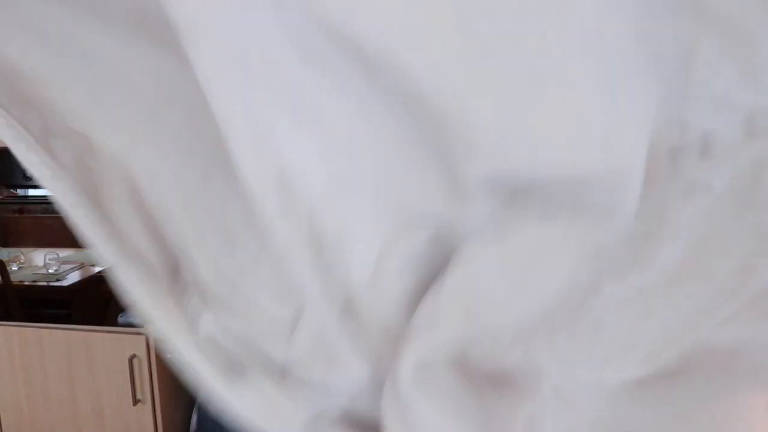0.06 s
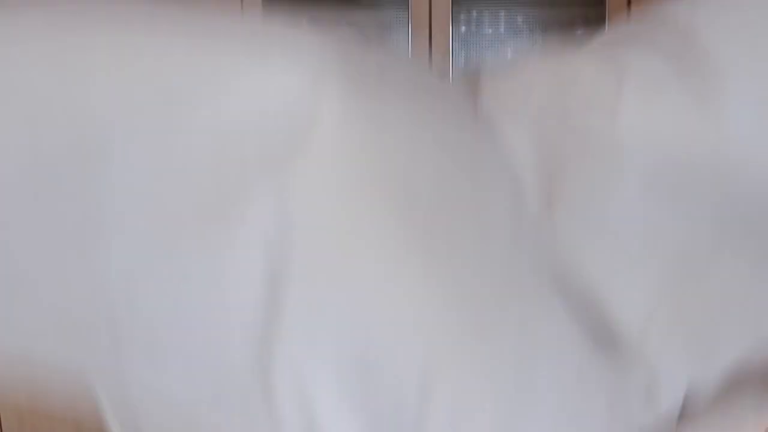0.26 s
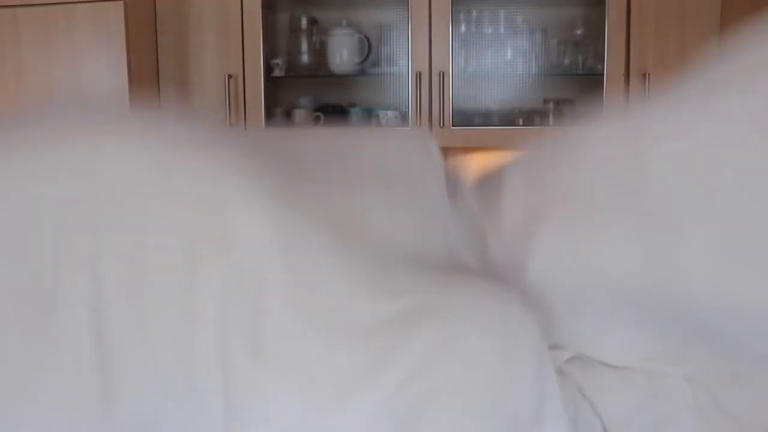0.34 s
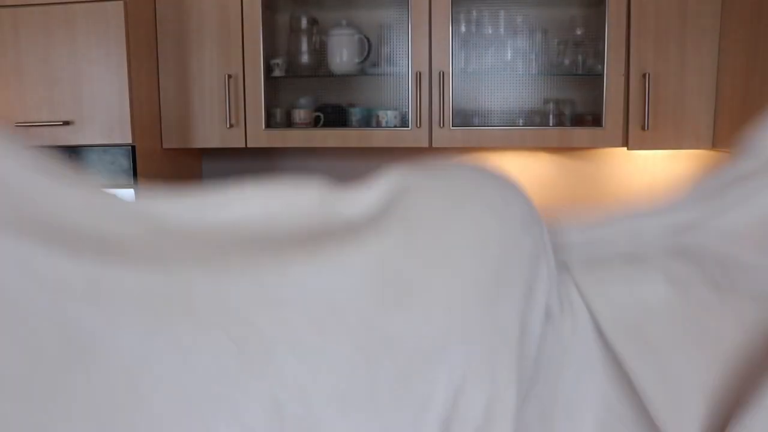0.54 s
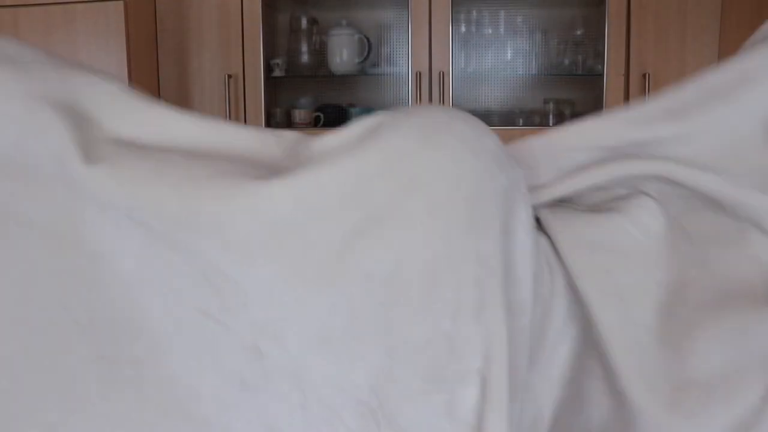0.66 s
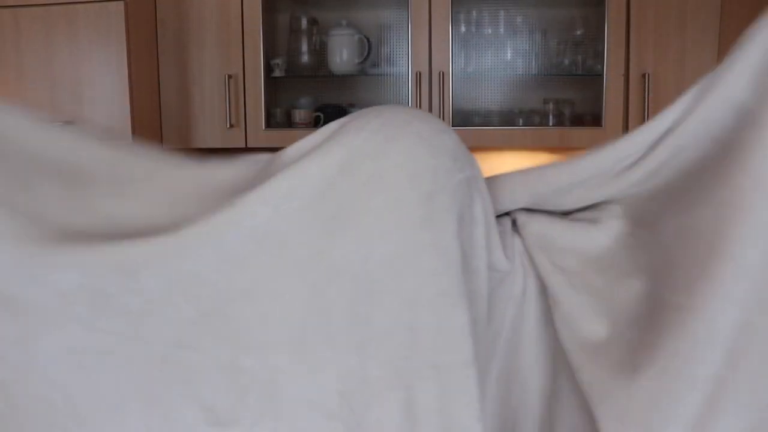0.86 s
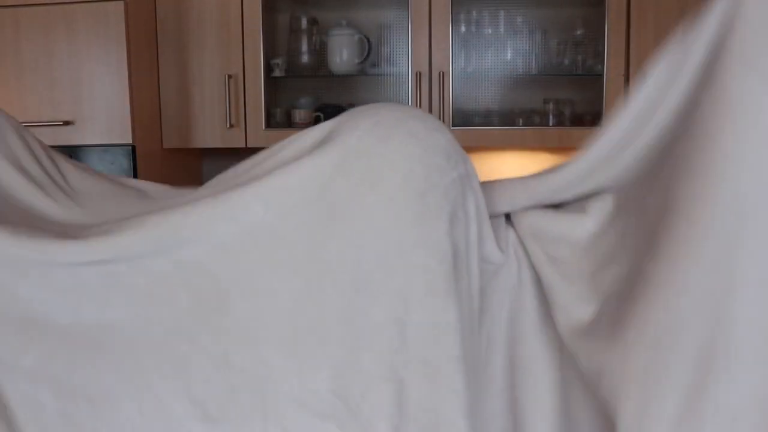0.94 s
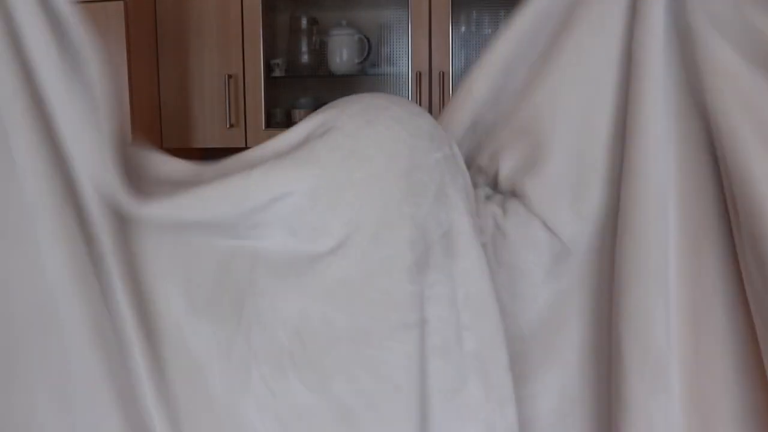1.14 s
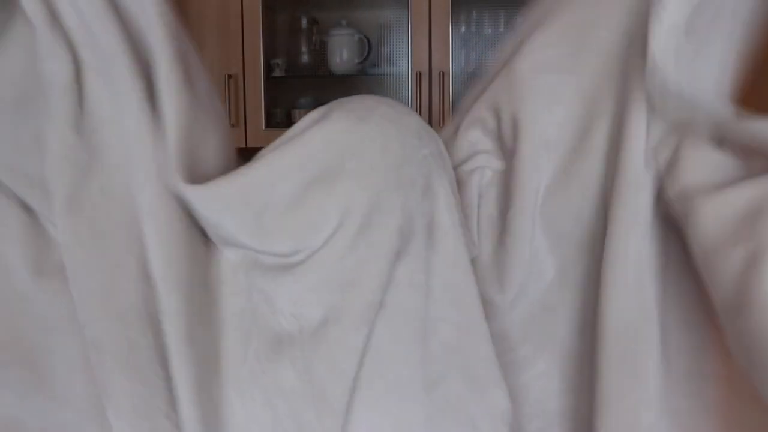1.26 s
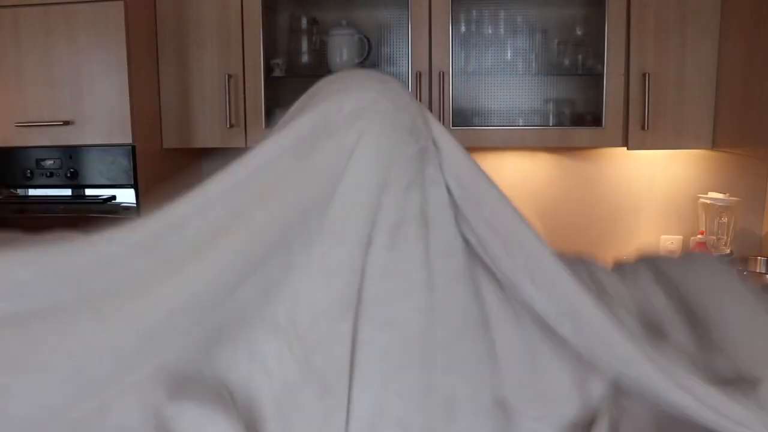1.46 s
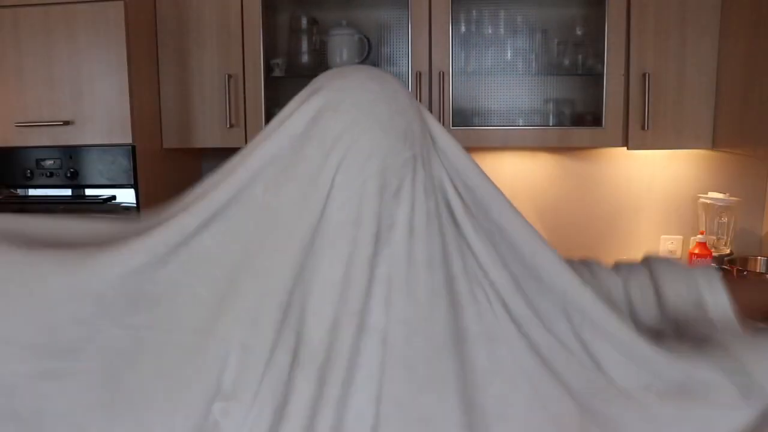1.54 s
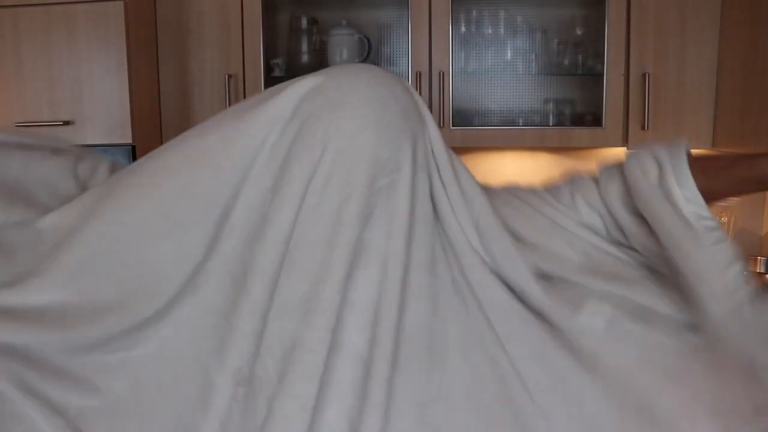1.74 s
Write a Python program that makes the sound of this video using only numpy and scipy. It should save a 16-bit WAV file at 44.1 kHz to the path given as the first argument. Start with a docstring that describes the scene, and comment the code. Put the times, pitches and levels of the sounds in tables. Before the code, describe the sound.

A large soft blanket is flung open close by, snapping taut in one loud, low whump at about 0.3 seconds. Its folds flop down softly around 0.5 to 0.7 seconds. From 0.9 to 1.4 seconds it is tugged in several quieter, dull flaps with faint ticks, and a soft low thud follows near 1.6 seconds. Sliding cloth hisses lightly throughout, and the small, quiet kitchen adds a short echo.

```python
"""Blanket flung open in a kitchen

Close by, a large soft blanket snaps taut in one loud whump, flutters down over someone and is
tugged in a few dull flaps. Buckling cloth thuds and ticks, the sliding pile hisses, pushed air
booms low. The small, hard, quiet room answers with echoes and standing waves."""
import sys
import numpy as np
from scipy import signal
from scipy.fft import rfft, irfft
from scipy.io import wavfile

SR = 44100
rng = np.random.default_rng(int(sys.argv[2]) if len(sys.argv) > 2 else 0)


def dump(signal):
    """Clip the signal to [-1, 1] and save it as 16-bit WAV at the path in sys.argv[1]."""
    limited = np.clip(np.atleast_2d(signal).T, -1, 1)
    pcm = np.round(limited * 32767).astype(np.int16)
    wavfile.write(sys.argv[1], SR, pcm)


N = 79380
TIME_S = np.arange(N) / SR

# Spectra of still room, sliding pile, slack fold, echoes and fibre fizz.
# Each row: frequency in Hz, relative gain in dB.
AIR_SPECTRUM = [(15, -33), (28, 2), (52, 3.5), (80, -4), (160, -11), (400, -16.5), (800, -20),
                (2000, -27.5), (4600, -38), (8000, -31), (12000, -34.5), (16000, -41)]
PILE_SPECTRUM = [(100, 13), (400, -18), (1000, 7.5), (2000, 5.5), (3300, 5.5), (4800, -1.5), (7500, 3),
                 (10000, 0), (16000, -8)]
FOLD_SPECTRUM = [(30, -45), (80, -7), (130, -0.5), (300, 1), (430, -0.5), (620, -10.5), (1500, -20),
                 (4000, -35), (16000, -75)]
ECHO_SPECTRUM = [(50, 4.5), (130, 6), (300, 3), (600, -0.5), (800, -0.5), (1100, 4), (1600, 3.5),
                 (4000, 2.5), (16000, 1.5)]
FIZZ_SPECTRUM = [(500, -30), (2000, 8.5), (3200, 3), (4700, -4), (7500, -1), (11000, -8), (16000, -24)]
# Diffuse field. Each row: frequency in Hz, left-right correlation.
COHERENCE = [(50, 0.92), (250, 0.87), (500, 0.61), (800, 0.48), (1200, 0.38), (2200, -0.072), (4000, -.05),
             (16000, -0.06)]
# Pile hiss. Each row: time in seconds, relative level in dB.
SLIDE_LEVELS = [(0, -53), (.17, -63.5), (.25, -52), (.33, -48), (.40, -53), (.47, -48.5), (.54, -57.5),
                (.61, -51.5), (.67, -53), (.71, -62), (.9, -61), (.99, -56.5), (1.05, -51.5), (1.11, -52),
                (1.19, -58.5), (1.3, -56.5), (1.52, -58.5), (1.68, -55), (1.8, -57)]
# Slack folds. Each row: start in seconds, decay in seconds, level in dB.
FOLD_EVENTS = [(.0, 0.036, -46.5), (0.109, 0.05, -51.5), (0.191, 0.035, -53), (.492, 0.073, -35.5),
               (0.532, 0.034, -40), (.615, 0.059, -39), (.787, 0.027, -48.5), (1.025, 0.038, -51.5),
               (1.176, 0.033, -43.5), (1.241, 0.032, -47), (1.562, 0.051, -46), (1.63, 0.025, -41)]
# Echo decay. Each row: frequency in Hz, T60 in seconds.
ECHO_DECAY = [(60, 0.53), (250, 0.3), (600, 0.48), (1500, 0.49), (4000, 0.72), (12000, 0.083)]
# Room resonances. Each row: frequency in Hz, relative level in dB, T60 in seconds.
KITCHEN_MODES = [(123, -26, 0.11), (152.8, -30, 0.16), (285.1, -22.5, 0.28), (399, -27, 0.31),
                 (433, -38.5, 0.21), (585, -33.5, 0.56), (650, -24, 0.29), (1157, -32.5, 0.18),
                 (1595, -21.5, 0.083)]
# Single creases. Each row: start in seconds, level in dB, band centre in Hz.
TICK_EVENTS = [(0.076, -50, 2000), (0.721, -48, 2330), (.921, -47, 2360), (1.000, -45, 7450),
               (1.241, -45, 2550), (1.305, -40, 3200), (1.715, -50, 3530)]
# Pushes of air. Each row: start in seconds, level in dB, pitch in Hz, decay in seconds.
PUFF_EVENTS = [(.213, -26.5, 161, 0.017), (.226, -45, 52, 0.015), (0.242, -14, 156, 0.013),
               (0.288, -10.5, 122.7, 0.011), (0.274, -20, 64.8, 0.019), (.323, -16.5, 51.4, 0.039),
               (0.329, -24.5, 129, 0.038), (0.422, -26, 49.5, 0.081), (0.511, -29.5, 58, 0.025),
               (0.552, -33, 57, 0.037), (0.618, -38, 48.2, 0.072), (1.022, -34, 57.7, 0.015),
               (1.176, -35, 53.6, 0.04), (1.224, -35.5, 63, .032), (1.315, -36, 52, 0.037),
               (1.644, -25, 55.7, 0.028), (1.759, -38, 60, 0.017)]
# Cloth pulled taut. Each row: start, rise and decay in seconds, level in dB,
# low and high band edges in Hz, crumple and fizz in dB relative to that level.
FLAP_EVENTS = [(0.215, 0.0036, 0.045, -26, 110, 570, -15, -32),
               (.256, 0.0016, 0.019, -17.5, 265, 665, -20.5, -26.5),
               (.267, 0.0021, 0.02, -10.5, 234, 534, -20, -26.5),
               (.288, 0.0012, 0.019, -17.5, 126, 336, -26.5, -29),
               (.319, 0.0048, 0.029, -21, 160, 634, -14.5, -25.5),
               (.867, 0.0058, 0.018, -35.5, 393, 820, -18, -28),
               (1.000, 0.0035, 0.029, -31.5, 380, 830, -11.5, -18),
               (1.075, 0.0041, 0.028, -32, 442, 780, -17.5, -19),
               (1.301, 0.006, 0.07, -38, 234, 780, 3, -17.5),
               (1.351, 0.0059, 0.035, -31.5, 250, 620, -10.5, -14),
               (1.379, 0.0063, 0.028, -34, 220, 610, -7.5, -20)]


def amp(db):
    """Decibels to gain."""
    return 10 ** (np.asarray(db) / 20)


def unit_rms(x):
    """Scales to rms 1."""
    return x / np.sqrt(np.mean(x ** 2) + 1e-20)


def lookup(table, hz):
    """Interpolates on a log-frequency axis."""
    knots_hz, values = np.transpose(table)
    return np.interp(np.log(hz + 1), np.log(knots_hz + 1), values)


def add(mix, start_s, sound):
    """Mixes a sound in place."""
    part = mix[..., max(round(start_s * SR), 0):][..., :sound.shape[-1]]
    part += sound[..., :part.shape[-1]]


def colour(x, gain, size=4096):
    """Minimum-phase filter with magnitude gain(hz)."""
    hz = abs(np.fft.fftfreq(size, 1 / SR))
    log_gain = np.log(np.maximum(gain(hz), 1e-5))
    response = np.exp(np.conj(signal.hilbert(log_gain)))
    taps = np.fft.ifft(response).real[:size // 2]
    return signal.fftconvolve(x, taps)[:len(x)]


def diffuse(noises, spectrum):
    """Two independent noises to a diffuse stereo field, alike in the bass."""
    hz, bins = np.fft.rfftfreq(noises.shape[1], 1 / SR), rfft(noises)
    coherence = lookup(COHERENCE, hz)
    mid = bins[0] * np.sqrt((1 + coherence) / 2)
    side = bins[1] * np.sqrt((1 - coherence) / 2)
    return irfft(np.array([mid + side, mid - side]) * amp(lookup(spectrum, hz)), noises.shape[1])


def pan(left_db):
    """Opposite left and right gains."""
    return amp([[left_db], [-left_db]])


def stroke(rise_s, decay_s, curve=1.35):
    """Envelope, peak 1: swells, holds, lets go."""
    t = TIME_S[:SR // 3]
    shape = (1 - np.exp(-(t / rise_s) ** 2)) * np.exp(-(t / decay_s) ** curve)
    return shape / shape.max()


def still_room(level_db=-47.5):
    """Faint steady noise, mostly bass."""
    return amp(level_db) * unit_rms(diffuse(rng.standard_normal((2, N)), AIR_SPECTRUM))


def fibres(spectrum, grain_db=2.5):
    """Countless fibres catch and slip, a few harder than the rest."""
    noise = rng.standard_normal((2, N))
    grain = amp(grain_db * np.minimum(rng.exponential(1, (2, N)), 5))
    return unit_rms(diffuse(noise * grain, spectrum))


def slide(gain_db=4):
    """The pile hisses as it drags over itself."""
    level_db = gain_db + np.interp(TIME_S, *np.transpose(SLIDE_LEVELS))
    return amp(level_db) * fibres(PILE_SPECTRUM) * pan(-0.7)


def creases(envelope, gain, kicks_per_s=3500):
    """Buckling cloth: a burst of tiny pressure kicks, at the envelope's rms."""
    signs = rng.choice([-1, 1], len(envelope))
    kicks = signs * (rng.random(len(envelope)) < kicks_per_s / SR)
    return unit_rms(colour(kicks * envelope, gain)) * np.sqrt(np.mean(envelope ** 2))


def folds(rise_s=0.0078):
    """Loose folds flop softly as the blanket sinks."""
    for start_s, decay_s, db in FOLD_EVENTS:
        flop = creases(stroke(rise_s, decay_s), lambda hz: amp(lookup(FOLD_SPECTRUM, hz)))
        yield start_s, amp(db) * flop


def sheet_spread(x, corner_hz=720, step_hz=352, depth_rad=1.8):
    """The wide sheet sends bass alike to both sides, treble along slightly different paths."""
    hz = np.fft.rfftfreq(len(x), 1 / SR)
    wander = np.array([np.interp(hz / step_hz, np.arange(128), row)
                       for row in rng.standard_normal((2, 128))])
    treble = hz ** 3 / (hz ** 3 + corner_hz ** 3)
    return irfft(rfft(x) * np.exp(1j * depth_rad * treble * wander), len(x))


def echoes(x, onset_s=0.0035):
    """Dense kitchen reflections, dying by band; a new set for each spot on the cloth."""
    t = TIME_S[:SR // 2]
    hz, frame_s, bins = signal.stft(rng.standard_normal((2, len(t))), SR, nperseg=256)
    decay = amp(-60 * frame_s / lookup(ECHO_DECAY, hz)[:, None])
    tail = signal.istft(bins * decay, SR, nperseg=256)[1][:, :len(t)]
    tail = diffuse(tail, ECHO_SPECTRUM) * np.minimum(t / onset_s, 1) ** 2
    return signal.fftconvolve(np.atleast_2d(x), tail / np.linalg.norm(tail[0]), axes=1)


def standing_waves(x, gain_db=-29):
    """Room resonances ring on after the cloth."""
    t = TIME_S[:SR // 2]
    ring = sum(amp(db - 60 * t / t60_s) * np.cos(2 * np.pi * hz * t) for hz, db, t60_s in KITCHEN_MODES)
    return amp(gain_db) * signal.fftconvolve(x, ring)[:N]


def ticks(q=3.1):
    """Now and then one small crease pops."""
    snap = stroke(rise_s=0.00025, decay_s=0.0058)
    for start_s, db, centre_hz in TICK_EVENTS:
        pop = creases(snap, lambda hz: 1 / np.hypot(1, q * (hz / centre_hz - centre_hz / (hz + 1))))
        yield start_s, amp(db) * pop


def puffs(rise_cycles=0.59, roughness=0.27, eddy_band_hz=(20, 120)):
    """Displaced air swings for a few low cycles, stirred by eddies."""
    out = np.zeros(N)
    eddy_filter = signal.butter(2, eddy_band_hz, "band", fs=SR, output="sos")
    for start_s, db, hz, decay_s in PUFF_EVENTS:
        envelope = stroke(rise_cycles / hz, decay_s)
        eddies = unit_rms(signal.sosfilt(eddy_filter, rng.standard_normal(len(envelope))))
        swing = np.sin(2 * np.pi * hz * TIME_S[:len(envelope)])
        add(out, start_s, amp(db) * envelope * (roughness * eddies - swing))
    return out * pan(0.5)


def flap_gain(hz, low_hz, high_hz, crumple_db, thud_order=3.14, crumple_hz=1534, crumple_order=2.53):
    """Flap spectrum: a band of thud, with crumple reaching above it."""
    thud_power = 1 / (1 + (hz / high_hz) ** (2 * thud_order))
    crumple_power = amp(crumple_db) ** 2 / (1 + (hz / crumple_hz) ** (2 * crumple_order))
    low_cut = (hz / low_hz) ** 2
    return np.sqrt(thud_power + crumple_power) * low_cut / np.hypot(1, low_cut)


def flaps():
    """Each stretch of cloth thuds as it pulls taut."""
    for start_s, rise_s, decay_s, db, low_hz, high_hz, crumple_db, _ in FLAP_EVENTS:
        thud = creases(stroke(rise_s, decay_s), lambda hz: flap_gain(hz, low_hz, high_hz, crumple_db))
        yield start_s, amp(db) * thud


def fizz(echo_db=-6):
    """The fibres fizz with every flap."""
    envelope = np.zeros(N)
    for start_s, rise_s, decay_s, db, *_, fizz_db in FLAP_EVENTS:
        add(envelope, start_s, amp(db + fizz_db) * stroke(rise_s, decay_s))
    direct = envelope * fibres(FIZZ_SPECTRUM)
    return direct * pan(-4) + amp(echo_db) * echoes(direct)[:, :N]


def scene(direct_db=-2.5, echo_db=-5):
    """Cloth in the kitchen, pushed air and hissing pile over the still room."""
    mono, cloth = np.zeros(N), np.zeros((2, N))
    for start_s, sound in [*flaps(), *folds(), *ticks()]:
        add(mono, start_s, sound)
        add(cloth, start_s, amp(echo_db) * echoes(sound))
        add(cloth, start_s, amp(direct_db) * sheet_spread(sound))
    return still_room() + cloth + standing_waves(mono) + fizz() + puffs() + slide()


def record(dry):
    """Steep low-pass."""
    cutoff_hz = 15850
    taps = signal.firwin(511, cutoff_hz, window=("kaiser", 9), fs=SR)
    return signal.oaconvolve(dry, taps[None], "same")


dry = scene()
out = record(dry)
dump(out)
```